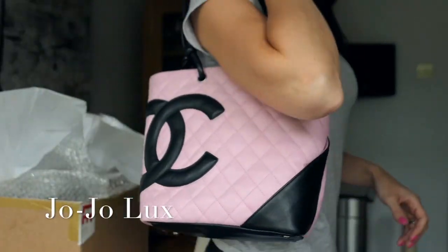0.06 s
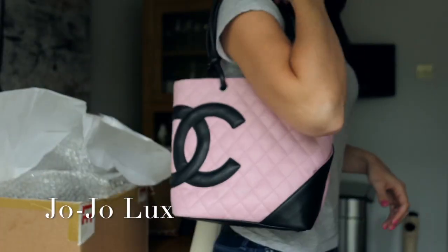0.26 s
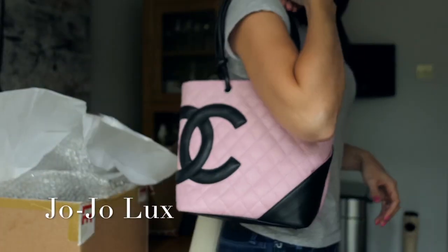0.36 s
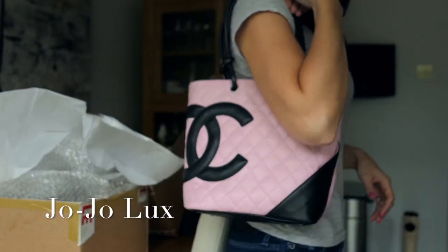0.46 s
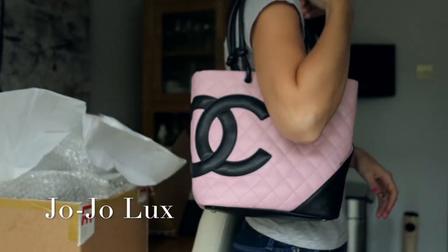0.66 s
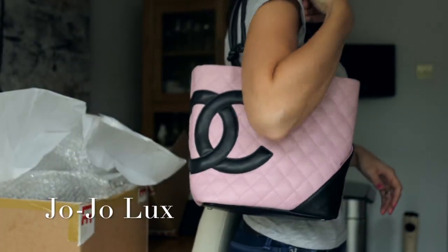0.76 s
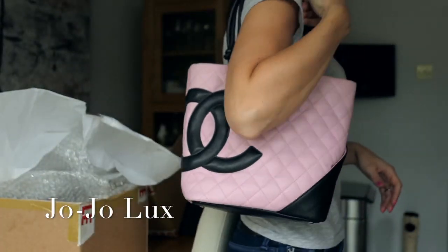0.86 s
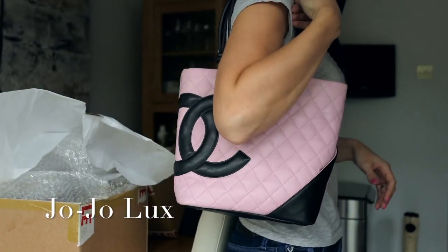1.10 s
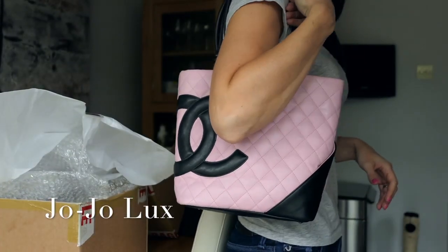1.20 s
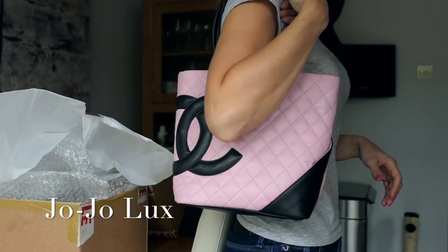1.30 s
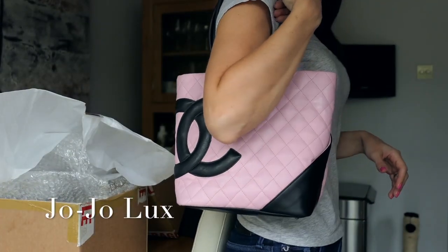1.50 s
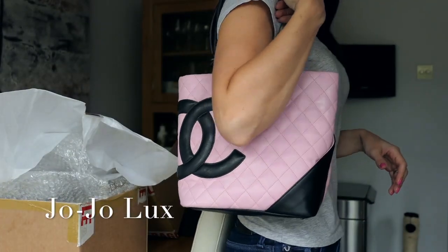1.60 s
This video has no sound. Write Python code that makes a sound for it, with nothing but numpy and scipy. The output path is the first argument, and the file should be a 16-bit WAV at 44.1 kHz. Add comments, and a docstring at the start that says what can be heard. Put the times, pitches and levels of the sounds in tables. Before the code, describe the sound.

One hollow thud of a leather shoulder bag, with cotton rustling in a quiet room.

```python
"""In a small, quiet room, someone hitches a quilted leather bag up on a shoulder.
The bag slides over a cotton shirt with a grainy rustle, then lands against the body with one
hollow thud: its leather slaps and the air inside rings. The shirt swishes, the strap sticks
and slips in a short creak, and an arm rubs lightly on the leather."""
import sys
import numpy as np
from scipy import signal
from scipy.fft import rfft, irfft
from scipy.io import wavfile

SR = 44100
rng = np.random.default_rng(int(sys.argv[2]) if len(sys.argv) > 2 else 0)


def generate_wav(sig):
    """Save sig (samples, or channels by samples) to the path in sys.argv[1] as 16-bit PCM at SR."""
    pcm = np.round(np.clip(np.atleast_2d(sig).T, -1, 1) * 32767).astype(np.int16)
    wavfile.write(sys.argv[1], SR, pcm)


N = 72765
T = np.arange(N) / SR

# The tone of each noise. Each row: frequency in Hz, relative level in dB.
AIR_TONE = [(25, -11.5), (60, -2), (110, 2), (175, 8), (300, 5), (480, 4), (620, 3), (850, 1.5),
            (1150, -9.5), (1800, -8), (2700, -15.5), (4000, -20), (10000, -22.5), (15000, -28.5)]
REVERB_TONE = [(60, 1), (170, -0.5), (300, -0.5), (550, -6.5), (1100, 4.5), (2500, 4), (6000, 4),
               (15000, -20)]
ARM_TONE = [(100, -13), (400, 2.5), (800, -0.5), (1200, -4.5), (2700, -4.5), (3800, -14), (6500, -15.5),
            (14000, -34)]
SHIRT_TONE = [(150, 3.5), (600, 1), (1200, 0.5), (2500, 2), (4200, -3), (7000, -6), (10500, -7),
              (15000, -16.5)]
SLIDE_TONE = [(60, -56), (180, -6), (350, -8), (650, 1.5), (1000, -6), (1900, -7), (3000, -15.5),
              (4200, -20.5), (10000, -26), (15000, -36)]
# How alike left and right are. Each row: frequency in Hz, likeness (1 the same, -1 opposite).
WIDE_LIKENESS = [(40, -.4), (90, -0.9), (180, -0.74), (400, -0.83), (1000, -0.44), (3000, -0.063),
                 (12000, 0.54)]
CLOSE_LIKENESS = [(140, -0.25), (280, 0.47), (550, 0.51), (1100, 0.67), (2300, 0.81), (5000, 0.74),
                  (9000, 0.81), (14000, 0.3)]
# How long the room rings on. Each row: frequency in Hz, seconds to fade by 60 dB.
REVERB_FADE = [(100, 0.8), (500, 0.58), (2000, 0.34), (12000, 1)]
# Echoes off hard surfaces close by. Each row: delay in seconds, level in dB.
NEAR_ECHOES = [(.0031, -18.5), (.0053, -16), (.0079, -18.5), (0.013, -12.5)]
# Where the bag is heard. Each row: frequency in Hz, left level minus right level in dB.
BAG_BALANCE = [(100, -0.5), (550, 0.8), (1100, -2.7), (2200, -2.5), (4500, -0.5), (12000, .8)]

# Strokes of the arm and the shirt. Each row: peak time, rise and fall in seconds, level in dB.
ARM_STROKES = [(.72, .1, 0.2, -57), (1.03, 0.039, .06, -55), (1.19, 0.081, 0.074, -53.5),
               (1.36, 0.1, 0.091, -50), (1.6, 0.024, 0.04, -56.5)]
SHIRT_STROKES = [(.04, 0.28, .12, -47.5), (.35, 0.072, 0.21, -45.5), (.648, 0.034, 0.077, -46),
                 (.88, 0.11, 0.081, -55)]
# How loud the sliding bag is. Each row: time in seconds, level in dB.
SLIDE_LEVELS = [(0, -59), (.18, -46), (.21, -43), (.245, -32), (.295, -33.5), (.325, -28.5), (.38, -30.5),
                (.45, -39.5), (.55, -45.5), (.8, -59), (1.65, -89)]
# Soft bumps of the bag. Each row: start in seconds, low ring in dB, middle ring in dB.
BAG_NUDGES = [(0.1234, -50, -26), (0.1386, -42.5, -33.5), (0.424, -42, -50), (0.477, -43, -39)]
# Slips of the strap. Each row: start in seconds, groan in dB, squeak in dB.
STRAP_SLIPS = [(0.855, -45, -63), (0.879, -49, -44), (.884, -43.5, -40.5), (.888, -43, -42.5),
               (.902, -48, -60), (0.917, -62.5, -46)]
# The bag lands and rebounds. Each row: start in seconds, hollow ring in dB, leather slap in dB.
LANDING_HITS = [(.3273, -26.5, -21), (0.3312, -16.5, -28), (.3351, -14, -21.5), (.3510, -20.5, -31)]

# The notes things ring with. Each row: pitch in Hz, relative level in dB, seconds to fade by 60 dB.
ROOM_NOTES = [(473, -28, 0.34), (526.4, -25.5, 0.25), (568, -28, 0.41), (596.3, -23.5, 0.26),
              (745, -30.5, 0.18), (852, -25, .22)]
NUDGE_LOW_NOTES = [(198, -9.5, 0.065), (269, 6, 0.028), (354, -1, .04)]
NUDGE_MID_NOTES = [(594, -13.5, 0.038), (880, -11.5, 0.0095), (1190, -12.5, 0.0092), (1520, -16, 0.018)]
GROAN_NOTES = [(207, -14, 0.071), (291, -2, 0.056), (358, -1.5, 0.16)]
SQUEAK_NOTES = [(2050, -30, 0.012), (2680, -7.5, 0.03), (2782, -2, 0.029)]
HOLLOW_NOTES = [(200, -27, 0.076), (492.5, -7, 0.11), (599, -1.5, 0.099), (700, -5, 0.012)]   # the air-filled bag
LEATHER_NOTES = [(1200, -14, 0.036), (1520, -8, 0.013), (1980, 0.5, 0.0073), (2500, 5, 0.0031),
                 (3300, -30, 0.004)]   # its stiff outside

REVERB_DB, REVERB_GAP_S, REVERB_BUILD_S = -38.5, 0.0019, 0.0026
HOLLOW_DULL_HZ, LEATHER_DULL_HZ, NUDGE_DULL_HZ = 930, 3220, 1560   # padding dulls hits above these


def from_db(db):
    """Turns decibels into a number to multiply by."""
    return 10 ** (np.asarray(db) / 20)


def unit_level(x):
    """Scales a sound so its average power is 1."""
    return x / np.sqrt(np.mean(x ** 2) + 1e-20)


def at_hz(table, hz):
    """Reads between a table's rows, giving each octave equal room."""
    row_hz, value = np.transpose(table)
    return np.interp(np.log(np.maximum(hz, 1)), np.log(row_hz), value)


def stereo(mid, side, alike):
    """Mixes two unrelated sounds into a left and right of the given likeness."""
    alike = np.clip(alike, -.98, .98)
    return np.sqrt(1 + alike) * mid + np.sqrt(1 - alike) * side * np.array([[1], [-1]])


def shape_noise(pair, tone, likeness):
    """Gives two plain noises a tone and a stereo width."""
    hz = np.arange(N // 2 + 1) * SR / N
    spectrum = stereo(*rfft(pair), at_hz(likeness, hz)) * from_db(at_hz(tone, hz))
    return unit_level(irfft(spectrum, N))


def friction(catches_per_s, spread_db):
    """Fibres catch at random times and strengths, blurred by an even hiss."""
    sizes = from_db(spread_db * np.minimum(rng.exponential(1, (2, N)), 5))
    signs = rng.choice([-1, 1], (2, N))
    caught = rng.random((2, N)) < catches_per_s / SR
    return unit_level(sizes * signs * caught) + rng.standard_normal((2, N))


def swells(strokes):
    """A loudness curve in which each stroke rises to its peak and fades."""
    power = 0
    for peak_s, rise_s, fall_s, db in strokes:
        width_s = np.where(T < peak_s, rise_s, fall_s)
        power += (from_db(db) * np.exp(-.5 * ((T - peak_s) / width_s) ** 2)) ** 2
    return np.sqrt(power)


def strike(starts, levels_db, notes):
    """Each click sets all the notes ringing and fading."""
    clicks, ring = np.full(N, 1e-18), 0
    clicks[(np.asarray(starts) * SR).astype(int)] = from_db(levels_db)
    for hz, db, fade_s in notes:
        decay = from_db(-60 / (fade_s * SR))   # share left after one sample
        swing = decay * np.cos(2 * np.pi * hz / SR)
        ring += from_db(db) * signal.lfilter([1, -swing], [1, -2 * swing, decay * decay], clicks)
    return ring


def dull(x, hz):
    """Turns down the highs, as padding takes the edge off a hit."""
    return signal.sosfilt(signal.butter(3, hz, fs=SR, output="sos"), x)


def room_air(level_db=-45.5, left_lead_db=1.0):
    """The steady hush of the room, slightly louder on the left."""
    hush = shape_noise(rng.standard_normal((2, N)), AIR_TONE, WIDE_LIKENESS)
    return from_db(level_db + left_lead_db * np.array([[.5], [-.5]])) * hush


def reverb(x, likeness):
    """Many reflections blur into a tail; each band of pitch fades at its own speed."""
    t, tail = T[:SR], 0
    edges_hz = np.geomspace(60, 16000, 13)
    noise = rng.standard_normal((2, 2, SR))
    for k, (low, high) in enumerate(zip(edges_hz, edges_hz[1:])):
        hz = np.sqrt(low * high)
        band = signal.butter(2, [low, high], "band", fs=SR, output="sos")
        mid, side = signal.sosfilt(band, noise[k % 2])
        fade = np.exp(-np.log(1000) * t / at_hz(REVERB_FADE, hz))
        tail += stereo(mid, side, at_hz(likeness, hz)) * from_db(at_hz(REVERB_TONE, hz)) * fade
    tail *= np.clip((t - REVERB_GAP_S) / REVERB_BUILD_S, 0, 1)
    return from_db(REVERB_DB) * signal.fftconvolve(x[None], tail, axes=1)[:, :N]


def add_echoes(pair):
    """Quick echoes off nearby surfaces change the tone but keep about the same loudness."""
    hz = np.arange(N // 2 + 1) * SR / N
    ripple = 1 + sum(from_db(db) * np.exp(-2j * np.pi * hz * delay_s) for delay_s, db in NEAR_ECHOES)
    return irfft(rfft(pair) * ripple / np.sqrt(np.mean(np.abs(ripple) ** 2)), N)


def to_the_right(pair):
    """Puts the bag a little to the right, mostly in the middle pitches."""
    balance_db = at_hz(BAG_BALANCE, np.arange(N // 2 + 1) * SR / N)
    return irfft(rfft(pair) * from_db(np.array([[.5], [-.5]]) * balance_db), N)


def arm_rub():
    """Skin rubs on leather with a light, dull rustle."""
    grains = friction(catches_per_s=3200, spread_db=3.5)
    return swells(ARM_STROKES) * shape_noise(grains, ARM_TONE, CLOSE_LIKENESS)


def shirt_swish():
    """Moving cotton makes a fine, bright hiss."""
    grains = friction(catches_per_s=8000, spread_db=-0.5)
    return swells(SHIRT_STROKES) * shape_noise(grains, SHIRT_TONE, CLOSE_LIKENESS)


def strap_creak():
    """The strap sticks and slips; each slip rings a low groan and a high squeak."""
    starts, groan_db, squeak_db = np.transpose(STRAP_SLIPS)
    groan = strike(starts, groan_db, GROAN_NOTES)
    squeak = strike(starts, squeak_db, SQUEAK_NOTES)
    creak = dull(groan + squeak, LEATHER_DULL_HZ)
    return creak + reverb(creak, CLOSE_LIKENESS)


def bag_nudges(reverb_boost_db=10):
    """Soft bumps before and after the landing, heard mostly through the room."""
    starts, low_db, mid_db = np.transpose(BAG_NUDGES)
    ring = strike(starts, low_db, NUDGE_LOW_NOTES) + strike(starts, mid_db, NUDGE_MID_NOTES)
    bumps = dull(ring, NUDGE_DULL_HZ)
    return bumps + from_db(reverb_boost_db) * reverb(bumps, WIDE_LIKENESS)


def bag_slide():
    """Leather drags over cotton with a grainy rustle as the bag is lifted."""
    level = from_db(np.interp(T, *np.transpose(SLIDE_LEVELS)))
    grains = friction(catches_per_s=5000, spread_db=2)
    return level * shape_noise(grains, SLIDE_TONE, CLOSE_LIKENESS)


def bag_thud(hollow_lag_s=0.00089):
    """The leather slaps, the hollow bag answers just after, and the room is left ringing."""
    starts, hollow_db, slap_db = np.transpose(LANDING_HITS)
    slap = dull(strike(starts, slap_db, LEATHER_NOTES), LEATHER_DULL_HZ)
    hollow = dull(strike(starts + hollow_lag_s, hollow_db, HOLLOW_NOTES), HOLLOW_DULL_HZ)
    room_ring = dull(strike(starts[:1] + hollow_lag_s, [0], ROOM_NOTES), HOLLOW_DULL_HZ)
    thud = hollow - slap
    return thud + reverb(thud, CLOSE_LIKENESS) + room_ring


def scene():
    """Room air, bag and clothes together."""
    air = room_air()
    knocks = to_the_right(bag_thud()) + bag_nudges()
    creak = strap_creak()
    rustles = to_the_right(bag_slide()) + shirt_swish() + arm_rub()
    return air + add_echoes(rustles) + creak + knocks


def record(dry, low_cut_hz=110, high_cut_hz=15350):
    """The microphone thins the bass, and the very highest sounds are cut off."""
    thin = signal.sosfilt(signal.butter(2, low_cut_hz, "high", fs=SR, output="sos"), dry)
    return signal.sosfilt(signal.ellip(10, .2, 80, high_cut_hz, fs=SR, output="sos"), thin)


dry = scene()
out = record(dry)
generate_wav(out)
```